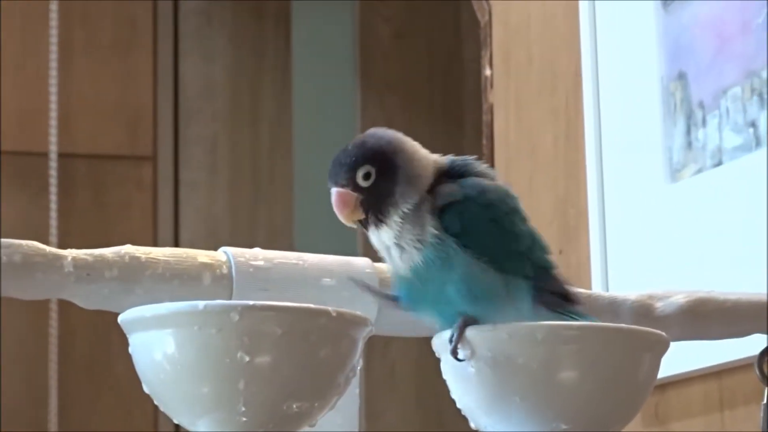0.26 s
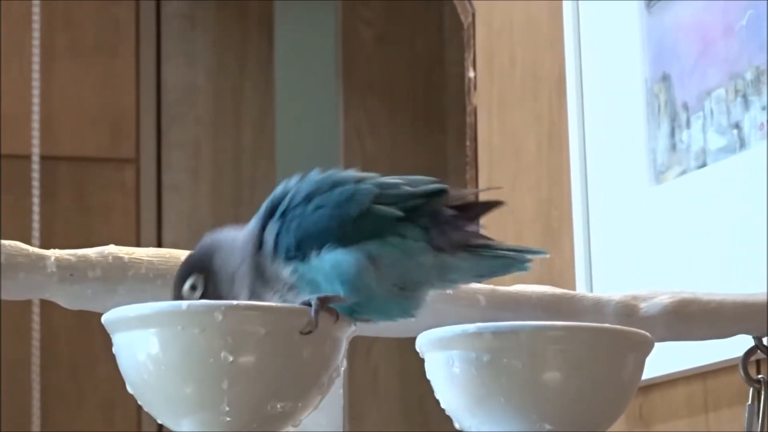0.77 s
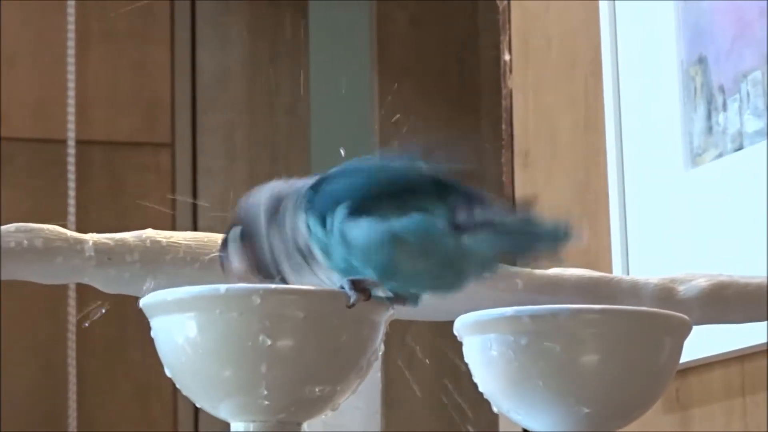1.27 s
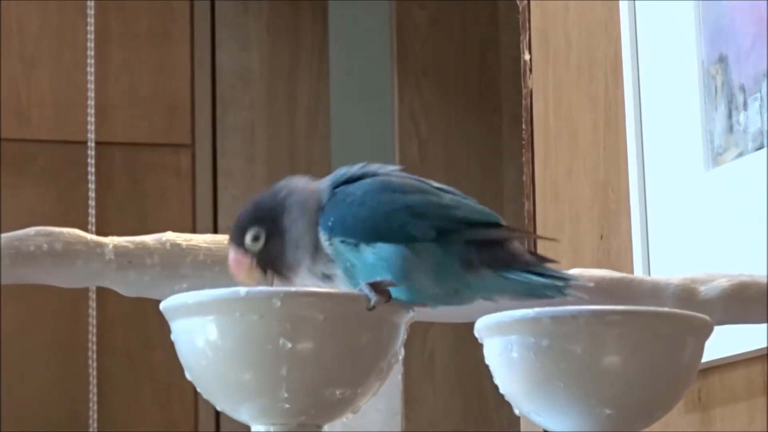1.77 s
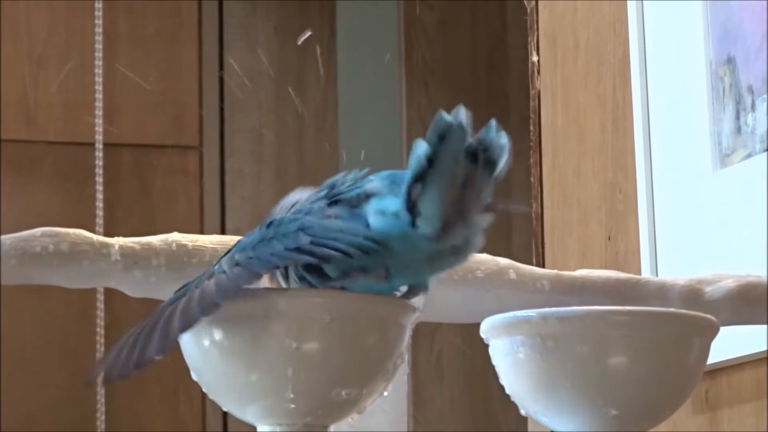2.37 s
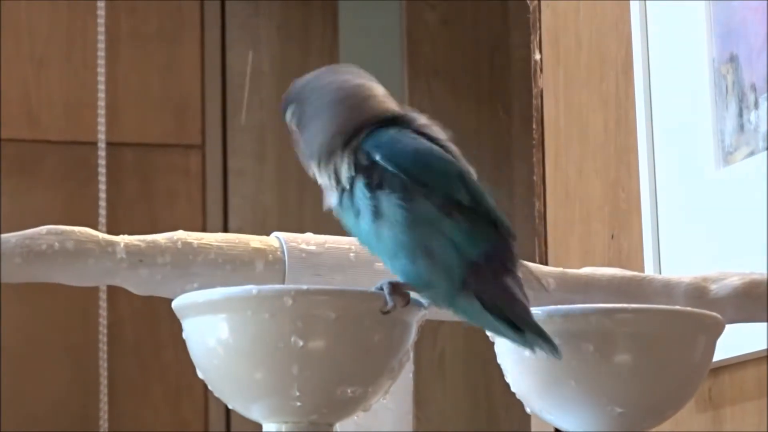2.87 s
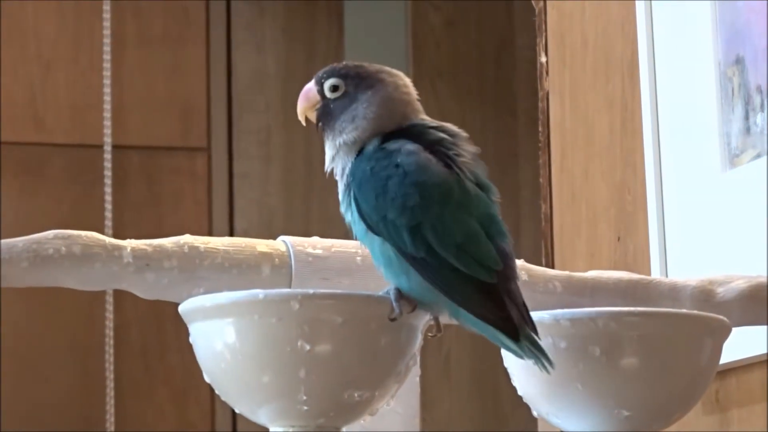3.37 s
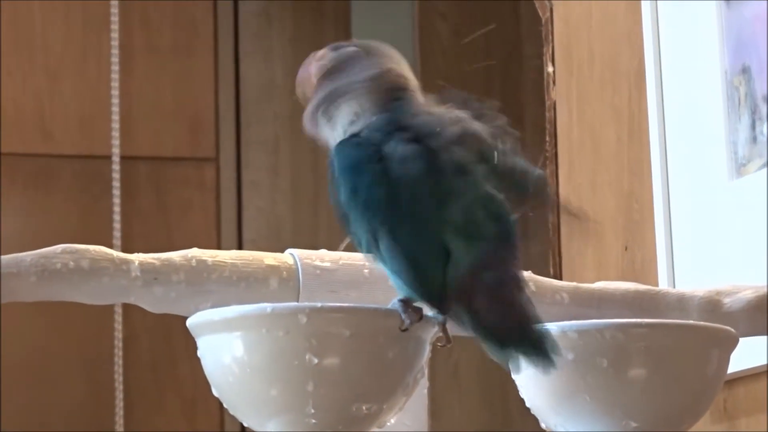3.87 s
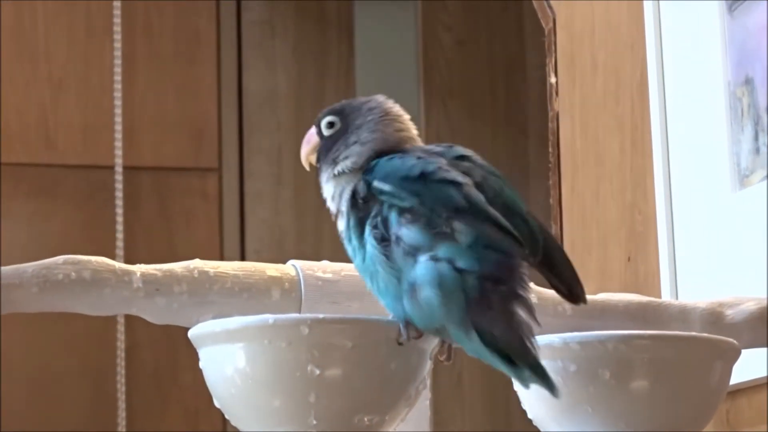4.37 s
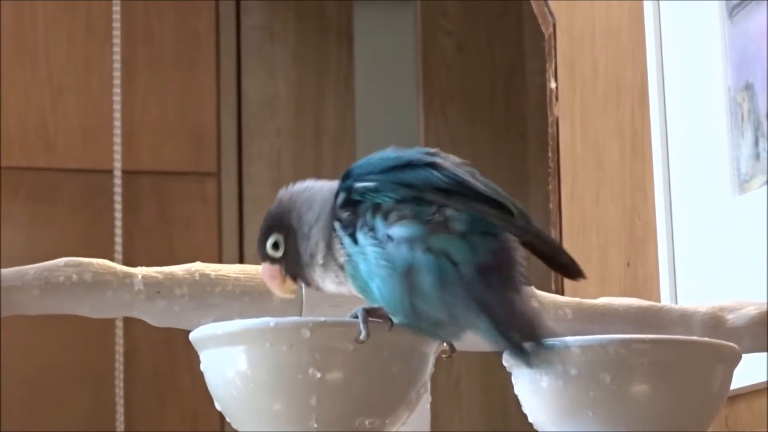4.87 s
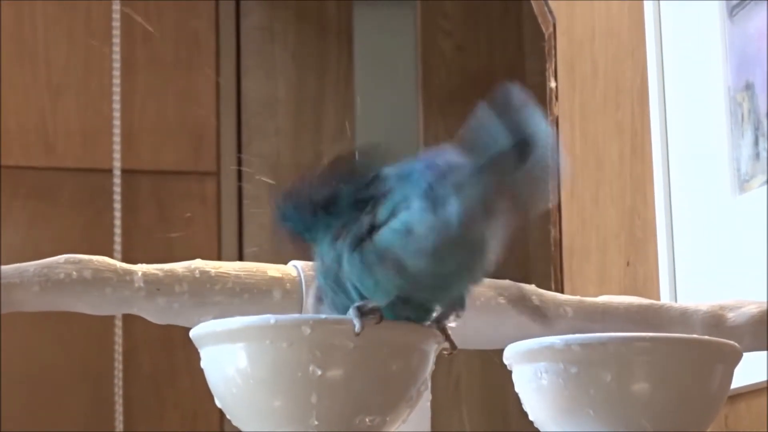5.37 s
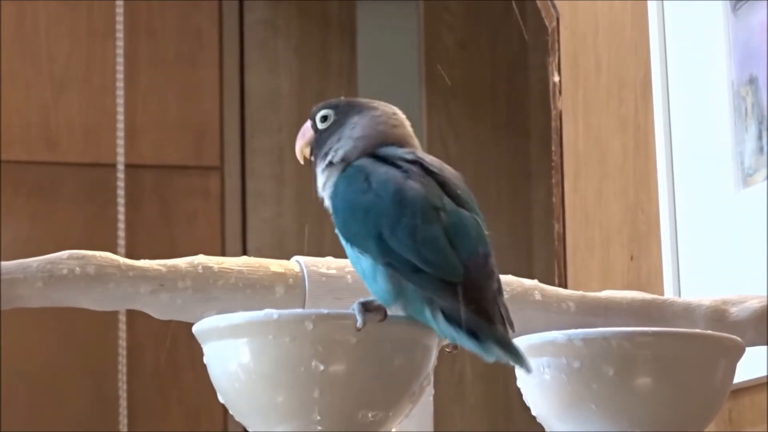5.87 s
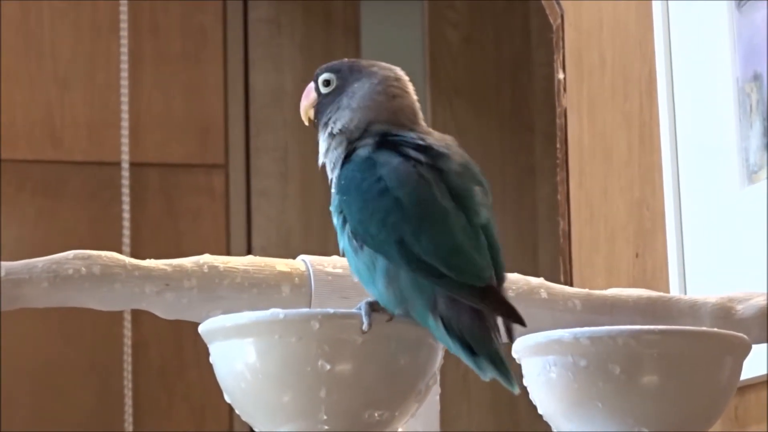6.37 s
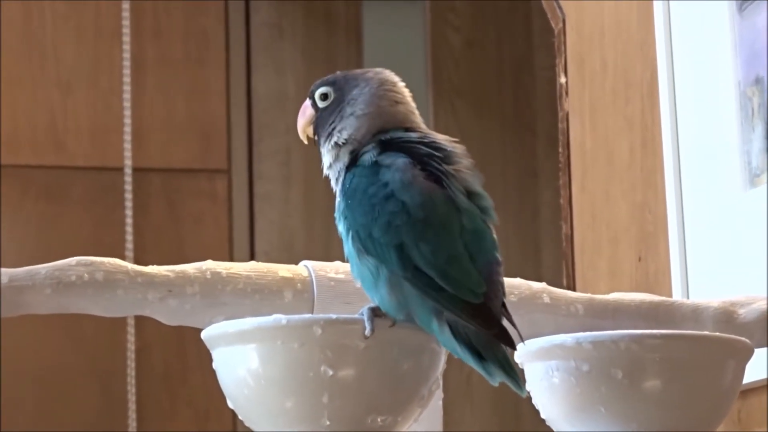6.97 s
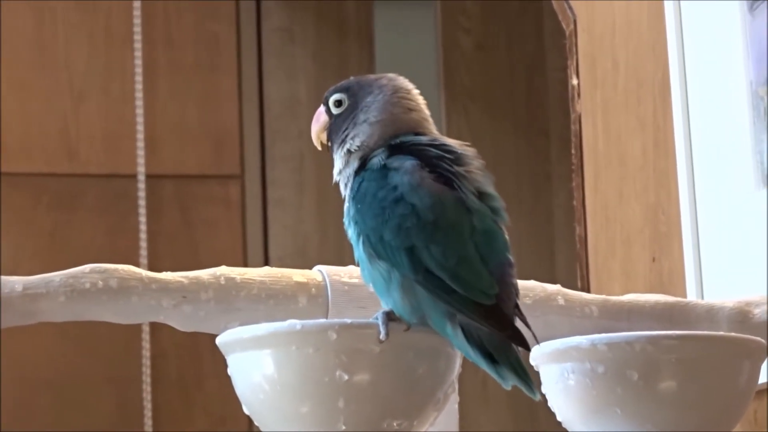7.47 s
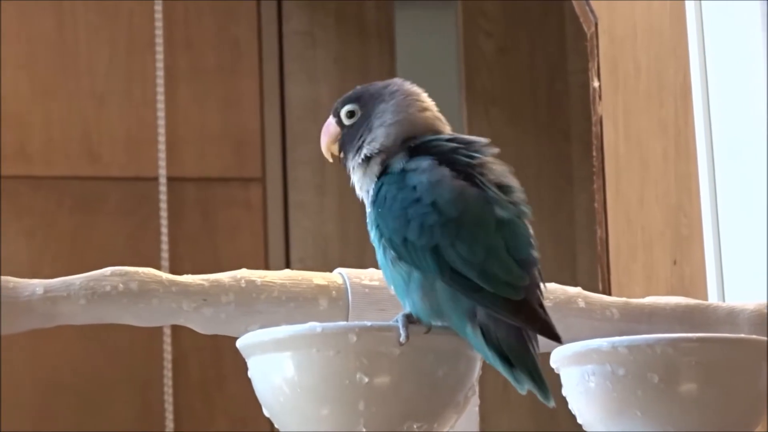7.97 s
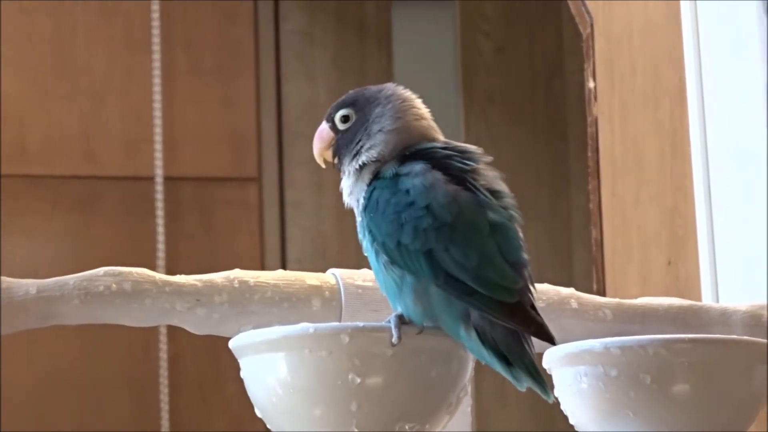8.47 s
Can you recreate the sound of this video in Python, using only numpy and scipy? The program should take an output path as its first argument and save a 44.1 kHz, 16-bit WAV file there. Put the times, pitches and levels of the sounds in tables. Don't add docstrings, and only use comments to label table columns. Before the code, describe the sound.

A small parrot bathes in a glazed bowl in a hard, echoing room, slightly left, over a broad low appliance hum and faint hiss. Wet splats and taps patter from the start; a hoarse, falling chirp comes at 0.8 s with a strong ringing tap at 0.9, another chirp at 1.8 and tap at 1.9. A second bird squawks at 2.0, rising then breaking into rasp, as feathers flutter strongly until 2.5; a sharp close tick lands at 2.3. A longer chirp follows at 2.9, then a calmer gap with faint distant whistles near 3.6. Feathers shake softly around 4, the loudest chirp comes at 4.4, bowls clink from 4.7 to 5.3 amid splashing, and a squawk follows at 5.4. Quieter chirps come at 6.2 and 7.3, a tap at 6.3, a strong squawk at 7.5, with dry close ticks and faint handling rumble around 7-8, then sparse drips until 8.7.

```python
import sys
import numpy as np
from scipy import signal
from scipy.fft import rfft, irfft
from scipy.io import wavfile

SR = 44100
rng = np.random.default_rng(int(sys.argv[2]) if len(sys.argv) > 2 else 0)


def attenuation_scalar(level_db):
    decades = np.asarray(level_db, float) / 20
    return 10 ** decades


def generate_wav(signal):
    frames = np.transpose(np.atleast_2d(signal))
    scaled = np.clip(frames, -1, 1) * 32767
    pcm = np.round(scaled).astype(np.int16)
    wavfile.write(sys.argv[1], SR, pcm)


N = 384552
T = np.arange(N) / SR


def unit(x):
    return x / np.sqrt(np.mean(x ** 2) + 1e-20)


def top_one(x):
    return x / np.abs(x).max()


def at_hz(points, hz):
    table_hz, value = np.transpose(points)
    return np.interp(np.log(np.maximum(hz, 1)), np.log(table_hz), value)


def drift(rate_hz, size):
    r = np.exp(-2 * np.pi * rate_hz / SR)
    settle = 20000
    noise = rng.standard_normal(size + settle)
    return unit(signal.lfilter([1], [1, -2 * r, r * r], noise)[settle:])


def band(x, low_hz, high_hz):
    limits = [low_hz, min(high_hz, .45 * SR)]
    return signal.sosfilt(signal.butter(2, limits, "band", fs=SR, output="sos"), x)


def peak(x, hz, width_hz):
    r = np.exp(-np.pi * width_hz / SR)
    feed = np.array([1, 0, -1]) * (1 - r * r) / 2
    return signal.lfilter(feed, [1, -2 * r * np.cos(2 * np.pi * hz / SR), r * r], x)


def add(out, s, x):
    i = round(s * SR)
    out[i:i + len(x)] += x[:N - i]


def phase_of(hz):
    return 2 * np.pi * np.cumsum(hz) / SR


def edges_of(t, length):
    return np.clip(np.minimum(t / 0.0016, (length - t) / 0.045), 0, 1)


# (start [s], length [s], level [dB], second voice [dB], octave [dB])
CHIRP_CALLS = [
    (0.814, .145, -17, 1.5, 2.5),
    (1.816, 0.13, -19, 7, -3.5),
    (2.898, 0.17, -17, 2.5, -3),
    (4.446, .16, -14.5, -4, -2),
    (6.232, 0.15, -21.5, -0.5, -2),
    (7.312, 0.13, -21.5, 1, -4.5),
]
# (time into the chirp [s], pitch [Hz])
CHIRP_GLIDE = [(0, 5070), (.008, 5500), (.016, 5397), (.024, 4850), (.036, 4787), (.043, 3941),
               (.065, 4250), (.2, 4340)]
# (pitch scale [ratio], pace [ratio], second voice [Hz])
CHIRP_VOICING = [(.97, 1.2, 6900), (.97, 1.1, 6450), (1.01, .9, 6350), (.99, 0.91, 6500), (.98, 1.2, 6500),
                 (.94, 1.1, 6600)]


def chirps(wobble, rough_db):
    out = np.zeros(N)
    calls = zip(CHIRP_CALLS, CHIRP_VOICING)
    for (s, length, level_db, second_db, octave_db), (scale, pace, second_hz) in calls:
        t = T[:round(length * SR)]
        size, done = len(t), t / length
        db = level_db - 20.5 * np.clip(1 - t / 0.021, 0, 1) - 6.5 * done
        db -= np.clip(5 * done - 4, 0, 1)
        second_db = second_db - 28 * np.clip(1 - done / 0.85, 0, 1)
        octave_db = octave_db - np.interp(done, [0, 0.43, 1], [6, 0, 12.5])
        hoarse = np.clip(t / 0.0375, 0, 1)

        hz = scale * np.interp(t * pace, *np.transpose(CHIRP_GLIDE))
        phase = phase_of(hz * (1 + wobble * hoarse * drift(286, size=size)))
        second_sag = 0.5 * (t - length / 2)
        second = phase_of(second_hz * (1 - second_sag + 0.0278 * drift(406, size=size)))
        tone = np.sin(phase) + attenuation_scalar(octave_db) * np.sin(2 * phase)
        tone += attenuation_scalar(octave_db - 19.0) * np.sin(3 * phase)
        second_voice = np.sin(second) + 0.031 * np.sin(second + phase)
        tone += np.clip((t - .04) / 0.05, 0, 1) * attenuation_scalar(second_db) * second_voice

        breath = attenuation_scalar(-10.5 - 12 * done) * unit(band(rng.standard_normal(size), 4600, 9300))
        tone += np.clip((t - .008) / 0.021, 0, 1) * breath
        flutter = 1.5 + rough_db / 11.7 * hoarse * drift(460, size=size)
        add(out, s, edges_of(t, length) * attenuation_scalar(db + 1.5) * flutter * tone)
    return signal.sosfilt(signal.butter(12, 3700, "high", fs=SR, output="sos"), out)


# (start [s], voice breaks [s], pitch [Hz], stack [dB], rasp [dB])
SQUAWK_CALLS = [
    (1.976, 2.086, 1496, -28.5, -11.5),
    (5.367, 5.496, 1462, -29.5, -13),
    (7.542, 7.67, 1450, -26.5, -10.5),
]
# (shift of the resonances [ratio], third-kilohertz resonance [dB])
BEAK_OPENING = [(1.046, -0.5), (0.97, -0.5), (1.016, 1)]
# (frequency [Hz], level [dB])
OVERTONE_STACK = [(900, -6), (1400, -4.5), (2800, 9), (4100, 6), (5500, -2), (7000, -12.5), (11000, -18)]
# (frequency [Hz], width [Hz], level [dB])
THROAT_RESONANCES = [(1450, 150, -20), (1900, 510, -13.5), (2610, 290, 0.5), (3062, 85, 0),
                     (3396, 340, 7.5), (3830, 360, 0), (4250, 280, 3), (6320, 3000, -11.5),
                     (11800, 2200, -20.5)]


def squawks(wobble, rasp_per_s):
    out, t = np.zeros(N), T[:SR // 3]
    size = len(t)
    calls = zip(SQUAWK_CALLS, BEAK_OPENING)
    for (s, broken_s, top_hz, stack_db, rasp_db), (scale, open_db) in calls:
        after = np.maximum(t + s - broken_s, 0)
        before = np.maximum(broken_s - s - t, 0)
        hz = top_hz * (1 - 0.3 * np.exp(-t / 0.02))
        break_db = 14
        turn_db = break_db * np.clip(before / 0.054, 0, 1)
        onset_db = 30 * np.clip(1 - t / 0.016, 0, 1)
        stack_db = stack_db - 0.5 * onset_db - 74 * t - break_db + turn_db - 357 * after
        rasp_db = rasp_db - onset_db - turn_db - 107 * before - 230 * after
        rasp_db -= 250 * np.maximum(after - 0.046, 0)

        phase = phase_of(hz * (1 + wobble * drift(480, size=size)))
        stack = sum(attenuation_scalar(at_hz(OVERTONE_STACK, k * hz)) * np.sin(k * phase) for k in range(1, 9))
        pulses = (rng.random(size) < rasp_per_s / SR) * rng.uniform(.3, 1, size)
        throb = np.cumsum(240 * (1 + 0.14 * drift(60, size=size))) / SR % 1
        pulses = pulses * (.25 + np.exp(-4 * throb))
        rasp = np.zeros(size)
        for k, (f, width_hz, db) in enumerate(THROAT_RESONANCES):
            ring = peak(peak(pulses, scale * f, width_hz), scale * f, 3.5 * width_hz)
            rasp += (-1) ** k * attenuation_scalar(db + open_db * (k == 3)) * unit(ring)
        voice = attenuation_scalar(stack_db) * (1 + .5 * drift(450, size=size)) * stack
        voice += attenuation_scalar(rasp_db) * unit(rasp)
        add(out, s, edges_of(t, t[-1]) * voice)
    return out


def crack(low_db, high_db, t60, rise_s, click=0):
    t = T[:SR // 5]
    white = rng.standard_normal(len(t)) * attenuation_scalar(-60 * t / t60) * np.clip(t / rise_s, 0, 1)
    white[0] += click
    low = band(white, 700, 3000)
    middle = -band(white, 3000, 8000)
    high = band(white, 8000, 16500)
    return attenuation_scalar(low_db) * top_one(low) + top_one(middle) + attenuation_scalar(high_db) * top_one(high)


# (time [s], peak [dB], hollow thud [dB], middle part [dB], bright part [dB])
DISH_CLINKS = [
    (4.6722, -8, -25.5, -28, -6.5),
    (4.819, -34, -23, -1, -19.5),
    (5.081, -11, -4, -16, -25),
    (5.175, -11.5, -9, -14, -36),
    (5.239, -6, -16, -12.5, -5.5),
]
# (frequency [Hz], level [dB], t60 [s])
DISH_MODES = [(880, 10, 0.025), (1450, 4.5, 0.1), (1930, 14, 0.041), (2380, 12, 0.1), (3060, -7, 0.14),
              (3270, -7.5, 0.38), (3365, 2, .07), (4350, 4, 0.052), (5510, -9, 0.061), (6200, -15, 0.103),
              (6880, -14, 0.29), (8130, 4, 0.071), (9755, -2, 0.071), (11460, -2, 0.063)]


def dishes():
    out, t = np.zeros(N), T[:SR // 2]
    for s, db, thud_db, middle_db, bright_db in DISH_CLINKS:
        touch = rng.standard_normal(len(t)) * attenuation_scalar(-20.5 - 60 * t / 0.082)
        touch[[0, round(.008 * SR)]] += [.6, 1.7]
        for hz, level_db, t60 in DISH_MODES:
            ring = peak(touch, hz, 2.2 / t60) + .7 * peak(touch, hz + 45, 2.2 / t60)
            colour_db = np.select([hz < 1600, hz < 2700, hz > 6000], [thud_db, middle_db, bright_db], 0)
            spread_db = 2 * rng.uniform(-1.7, 1)
            add(out, s, attenuation_scalar(db - 10.5 + level_db + colour_db + spread_db) * top_one(ring))
        add(out, s, attenuation_scalar(db - 7.0) * crack(thud_db, bright_db, t60=0.039, rise_s=0.00095))
        add(out, s + 0.0088, attenuation_scalar(db - 10) * crack(thud_db, bright_db, t60=0.053, rise_s=0.0027))
    return band(out, 290, 14600)


def splat(low_db, high_db):
    return crack(low_db, high_db, t60=.11, rise_s=.006) * (1 + .5 * drift(120, size=SR // 5))


# (time [s], peak [dB], below 3 kHz [dB], above 8 kHz [dB])
WET_SPLATS = [(.0094, -19.5, -18, -20), (0.2887, -24.5, -19, 3.5), (0.3525, -19, -9.5, -34),
              (0.383, -26, -39, 6.5), (0.6333, -21.5, -14, 2.5), (0.6806, -21, 4.5, -25),
              (0.7865, -24.5, -3, -9), (1.5718, -18, -15, -0.5), (2.2979, -12.5, -94, -6.5),
              (2.311, -13.5, -1, -36), (2.578, -30.5, -12, 5), (4.04, -41, -12, 11), (4.141, -39, -7, 10),
              (4.1046, -32.5, -6, -23), (4.4036, -32, -31, -8), (5.1338, -16, 2, -3),
              (6.211, -25.5, -25, 5), (6.553, -24.5, -6.5, -28), (6.821, -37, -15, 3), (6.911, -36, 2.5, 5),
              (6.96, -47, 0, 0), (7.1908, -30.5, -18, -19), (8.0436, -35, 0, -15),
              (8.1222, -22.5, -43.5, -3), (8.4024, -32.5, -25, -18)]
# (time [s], peak [dB], below 3 kHz [dB], above 8 kHz [dB], ringing pitch [Hz])
RINGING_TAPS = [(.1152, -34.5, -20, 8.5, 9120), (.198, -36, -25, 8.5, 7350), (0.411, -20.5, -8.5, 1, 6600),
                (.603, -33, -13, -12, 6200), (0.8794, -4.5, -21, -20, 4320), (1.1515, -34, 9, -15, 1964),
                (1.1791, -34, -13, 5, 1900), (1.204, -32.5, 11.5, 5, 4440), (1.2191, -35, 1, -20, 1665),
                (1.3957, -21.5, -12, -11, 11950), (1.405, -36, -8, -18, 3420),
                (1.9002, -6, -45.5, -36, 4350), (4.2584, -26.5, -9.5, -31, 6460),
                (5.2896, -23.5, 4.5, -25, 4330), (5.359, -30, -3, -10, 1814), (6.283, -14.5, -9, -6, 4630),
                (8.4421, -42, -9, 4, 6400)]


def taps():
    out, t = np.zeros(N), T[:SR // 5]
    lead_s = .002
    for s, db, low_db, high_db in WET_SPLATS:
        add(out, s - lead_s, attenuation_scalar(db) * splat(low_db, high_db))
    for s, db, low_db, high_db, hz in RINGING_TAPS:
        ring = peak(rng.standard_normal(len(t)) * attenuation_scalar(-60 * t / .15), hz, .035 * hz)
        ring_db = 2.5 + 6 * (hz < 2000)
        add(out, s - lead_s, attenuation_scalar(db) * (splat(low_db, high_db) + attenuation_scalar(ring_db) * top_one(ring)))
    return band(out, 420, 13000)


# (time [s], peak [dB], below 3 kHz [dB], above 8 kHz [dB])
NEAR_TICKS = [(2.2844, -19, -7, -13.5), (2.3115, -0.5, -20, -9), (2.4017, -30, -5, 16.5),
              (5.1344, -1, -40.5, -13), (6.916, -27, 0, -20.5), (7.1726, -24.5, 4.5, 4.5),
              (7.3111, -25.5, 8, -15), (7.315, -8, -1, 5), (7.514, -26.5, -1, -17), (7.612, -25.5, 12, 9),
              (7.6257, -0.5, -6, -12), (7.8315, -36, 14.5, -29), (8.1446, -12, -13, -41),
              (8.217, -25, 0.5, -5), (8.226, -35, 13, -23)]


def ticks():
    out = np.zeros(N)
    for s, db, low_db, high_db in NEAR_TICKS:
        snap = crack(low_db, high_db, t60=.014, rise_s=.001, click=5)
        knock = peak(peak(snap, 1390, 260), 1153, 340)
        add(out, s, attenuation_scalar(db - 0.5) * (snap + attenuation_scalar(low_db - 6.0) * top_one(knock)))
    return band(out, 950, 19000)


def ports(x):
    paths = rng.standard_normal(round(0.0019 * SR))
    side = attenuation_scalar(-13) * np.convolve(x, paths / np.linalg.norm(paths))[:N]
    return np.array([x + side, x - side])


# (time [s], peak [dB], pitch [Hz])
PERCH_BUMPS = [
    (2.319, -22.5, 270.4),
    (3.941, -32, 282),
    (5.3, -29.5, 160.5),
    (5.358, -28.5, 169.6),
    (7.827, -38, 483),
]
# (start [s], length [s], level [dB])
HAND_RUMBLE = (7.0, 0.48, -53)


def bumps():
    out, t = np.zeros(N), T[:SR // 2]
    for s, db, hz in PERCH_BUMPS:
        swell = attenuation_scalar(db - 60 * t / 0.23) * np.clip(t / 0.0086, 0, 1)
        add(out, s, swell * np.sin(2 * np.pi * hz * t))
    s, length, db = HAND_RUMBLE
    size = round(length * SR)
    add(out, s, attenuation_scalar(db) * np.hanning(size) * unit(band(rng.standard_normal(size), 22, 47)))
    return out


# (start [s], length [s], pitch [Hz], level [dB])
DISTANT_WHISTLES = [
    (3.552, 0.34, 4280, -53),
    (3.595, 0.051, 940, -38),
    (5.73, 0.083, 2210, -40),
]


def far_whistles():
    out = np.zeros(N)
    for s, length, hz, db in DISTANT_WHISTLES:
        size = round(length * SR)
        tone = peak(peak(rng.standard_normal(size), hz, 400), hz, 400)
        add(out, s, attenuation_scalar(db) * np.hanning(size) * unit(tone))
    return out


def diffuse(mid, side, side_db):
    size = len(side)
    hz = np.arange(size // 2 + 1) * SR / size
    side = irfft(rfft(side) * attenuation_scalar(at_hz(side_db, hz)), size)
    return np.array([mid + side, mid - side])


# (frequency [Hz], t60 [s])
ROOM_DECAY = [(300, 0.72), (2000, 0.44), (5000, 0.37), (9000, 0.33), (15000, 0.26)]
# (frequency [Hz], side minus mid [dB])
ECHO_WIDTH = [(300, -34), (1000, -11), (3000, -10), (7000, -11), (15000, -27)]


def room(x):
    t = T[:SR]
    white = rng.standard_normal((2, SR))
    tail = np.zeros((2, SR))
    for low_hz in 70 * 2 ** np.arange(0, 8.):
        t60 = at_hz(ROOM_DECAY, np.sqrt(2) * low_hz)
        tail += band(white, low_hz, 2 * low_hz) * attenuation_scalar(-60 * t / t60)
    tail = diffuse(*(tail * np.clip(t / 0.00067, 0, 1)), ECHO_WIDTH)
    return signal.fftconvolve(x[None], tail / np.sqrt(np.sum(tail[0] ** 2)), axes=1)[:, :N]


# (frequency [Hz], side minus mid [dB])
AIR_WIDTH = [(60, -31), (130, -8), (290, -7), (640, 2), (1410, 1), (3100, -4.5), (8000, -8.5),
             (15000, -22.5)]


def air(spectrum, peaks, patchy_db):
    white = rng.standard_normal((2, N))
    hz = np.arange(N // 2 + 1) * SR / N
    body = unit(irfft(rfft(white) * attenuation_scalar(at_hz(spectrum, hz)), N))
    body = body + sum(attenuation_scalar(db) * unit(peak(white, f, width_hz)) for f, width_hz, db in peaks)
    return unit(diffuse(*body, AIR_WIDTH)) * attenuation_scalar(patchy_db * drift(22.5, size=N))


# (start [s], length [s], level [dB])
FEATHER_SHAKES = [(0, 0.064, -45), (0.04, 1.37, -52), (0.59, .45, -54), (1.117, 0.79, -59.5),
                  (1.854, 0.28, -43.5), (2.135, 0.38, -46.5), (2.43, .35, -56), (3.755, 0.71, -55.5),
                  (3.853, .25, -60), (4.51, 0.92, -54.5), (5.175, 0.21, -48), (5.352, 0.28, -48.5),
                  (5.496, 0.63, -59), (6.166, 1.3, -64), (6.497, 0.24, -53), (7.395, 0.39, -55.5),
                  (7.955, 0.42, -57.5)]
# (frequency [Hz], level per Hz [dB])
HISS_COLOUR = [(1000, -8), (1700, -17.5), (1920, -3.5), (3850, -7.5), (5480, -10), (13400, -11),
               (15900, -16.5), (16100, -40)]


def feathers():
    power = np.full(N, attenuation_scalar(-62) ** 2)
    for s, length, db in FEATHER_SHAKES:
        add(power, s, attenuation_scalar(db) ** 2 * np.hanning(round(length * SR)))
    return np.sqrt(power) * attenuation_scalar(10) * air(HISS_COLOUR, [], patchy_db=1.1)


# (time [s], level [dB])
HUM_LEVEL = [(0, -41.5), (.85, -38), (1.2, -41.5), (1.95, -42), (2.2, -37.5), (2.5, -41.5), (3.2, -42.5),
             (3.75, -39), (4.4, -41), (4.8, -39), (5.3, -40), (5.46, -46), (6.1, -44.5), (6.9, -42.5),
             (7.7, -42.5), (8.2, -39.5), (8.72, -42.5)]
# (frequency [Hz], level per Hz [dB])
HUM_COLOUR = [(15, -56), (25, -14), (69, -9), (115, -6), (245, -4.5), (277, -4), (447, -7.5), (558, -5),
              (784, -9.5), (939, -5), (1710, -14), (1930, -15.5), (3000, -20.5), (3900, -59), (6600, -120)]
# (frequency [Hz], width [Hz], level [dB])
HUM_RESONANCES = [(95.4, 4.7, -20), (115.2, 3.3, -18), (280.8, 17.4, -10)]


def appliance_hum():
    level = attenuation_scalar(np.interp(T, *np.transpose(HUM_LEVEL)))
    return level * air(HUM_COLOUR, HUM_RESONANCES, patchy_db=1.57)


def scene():
    voices = chirps(wobble=0.03145, rough_db=6.5) + squawks(wobble=0.031, rasp_per_s=2500)
    voices += far_whistles()
    clinks, splats, near, soft = dishes(), taps(), ticks(), bumps()
    wet = room(attenuation_scalar(2.0) * voices + clinks + attenuation_scalar(-3.5) * splats + attenuation_scalar(-14.5) * (near + soft))
    direct = attenuation_scalar(-6) * voices + attenuation_scalar(1.5) * clinks + attenuation_scalar(-5.5) * splats + ports(near) + soft
    lean = attenuation_scalar(np.array([[.7], [-.7]]))
    return lean * (direct + wet) + appliance_hum() + feathers()


def top_cut(x):
    return signal.sosfilt(signal.butter(12, 16820, fs=SR, output="sos"), x)


def record(dry):
    rounded = 1.05 * np.tanh(dry / 1.1)
    mix = signal.sosfilt(signal.ellip(8, .5, 60, 15950, fs=SR, output="sos"), rounded)
    return top_cut(mix)


dry = scene()
out = record(dry)
generate_wav(out)
```